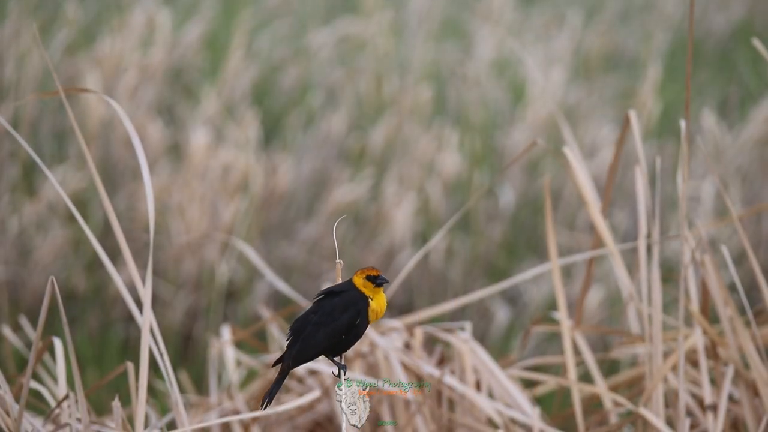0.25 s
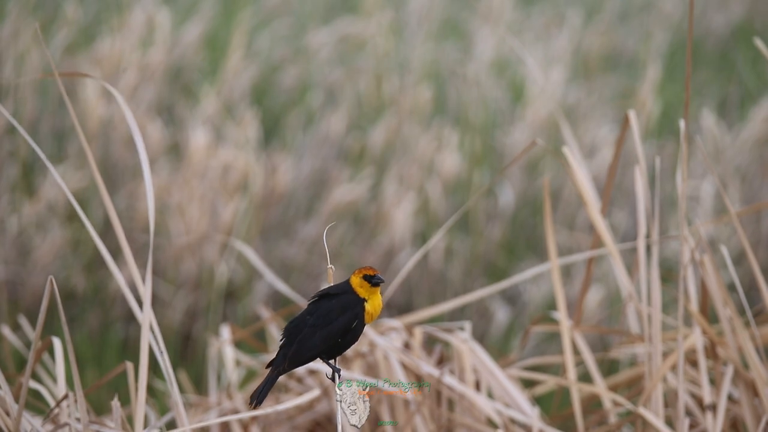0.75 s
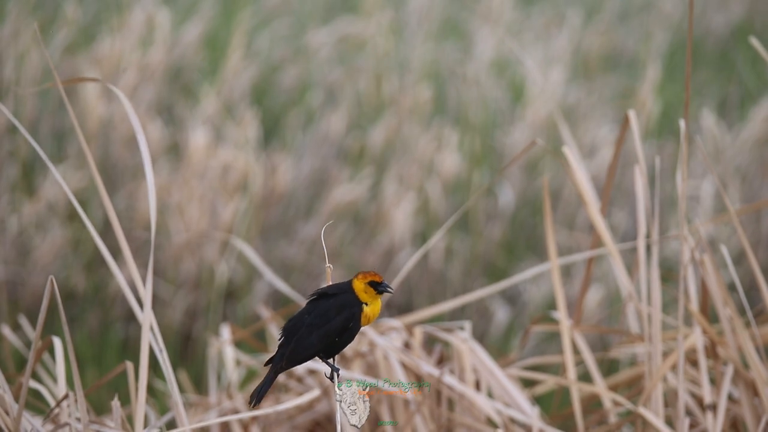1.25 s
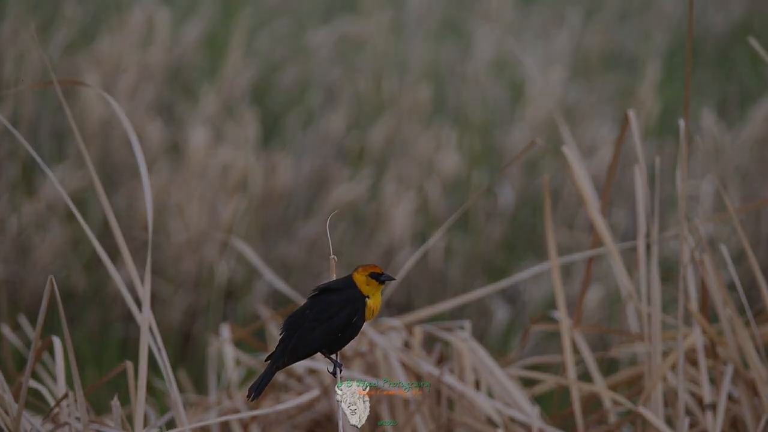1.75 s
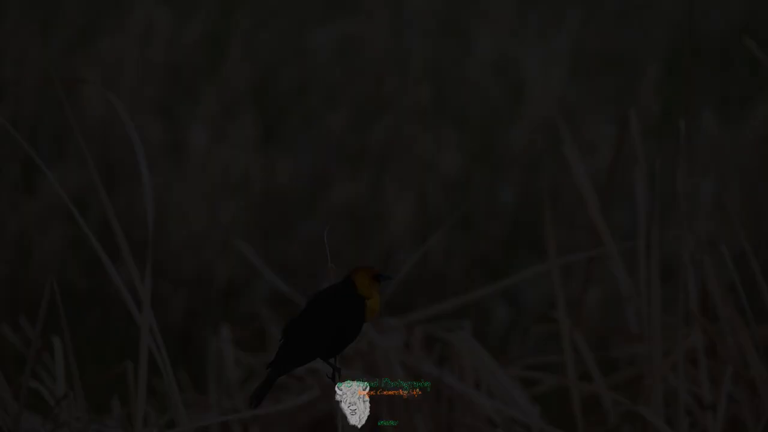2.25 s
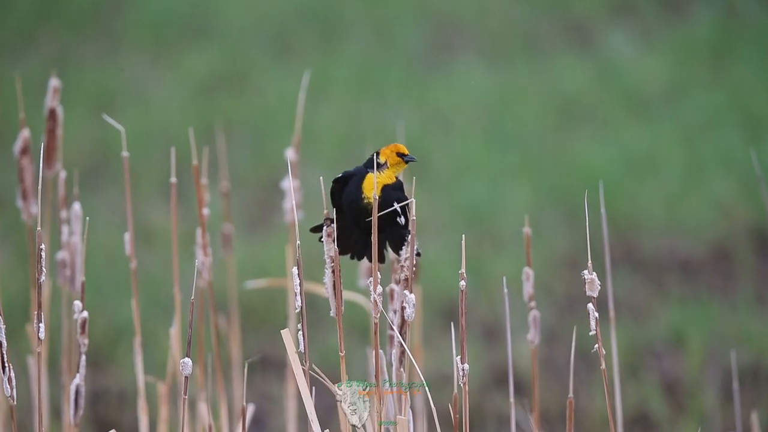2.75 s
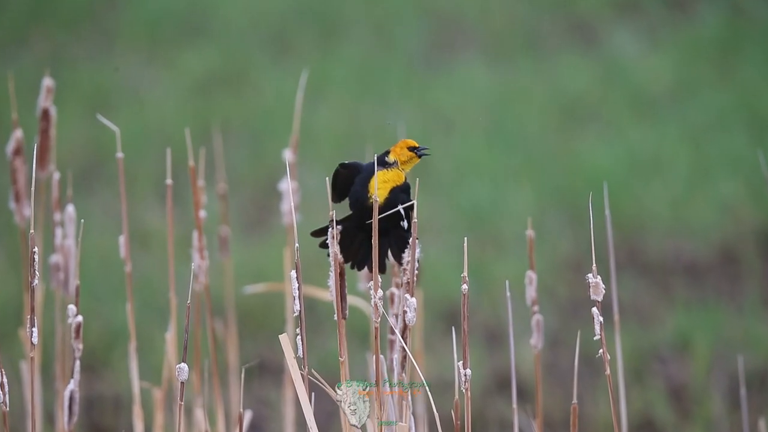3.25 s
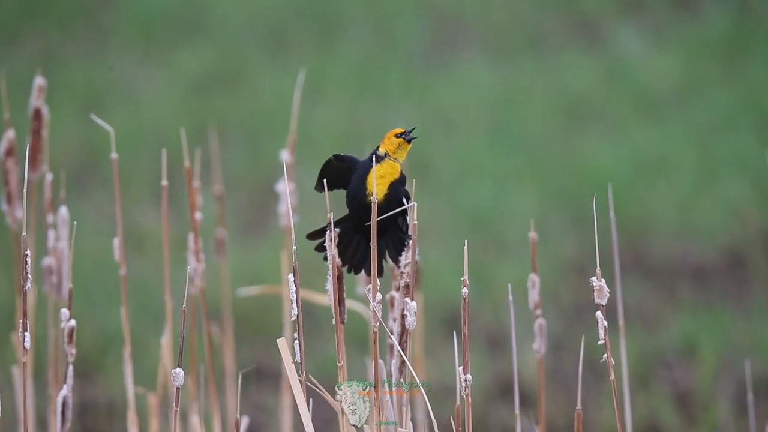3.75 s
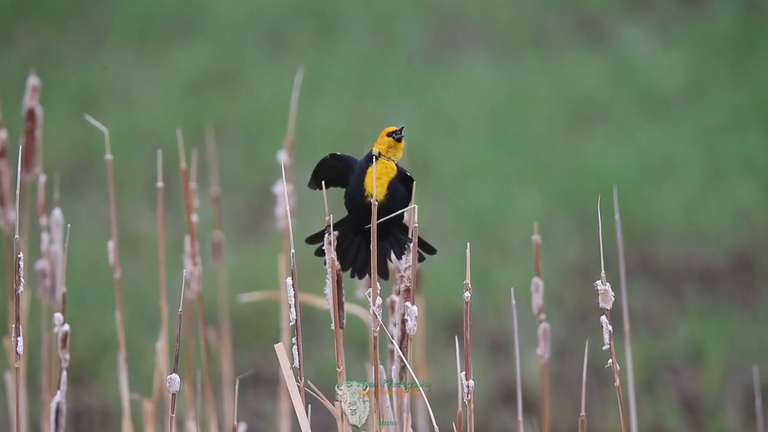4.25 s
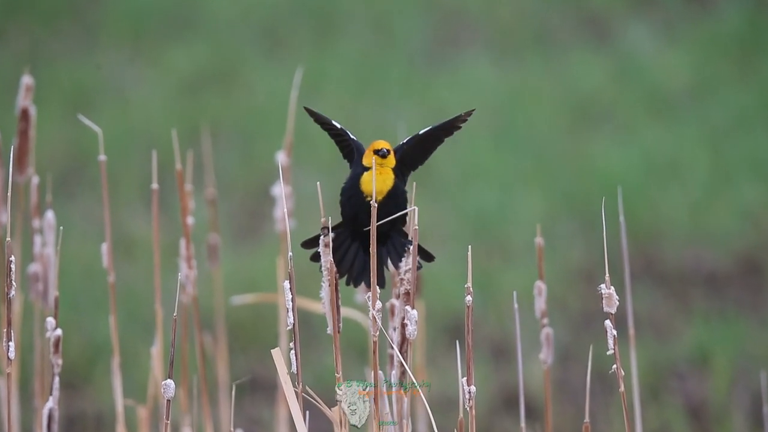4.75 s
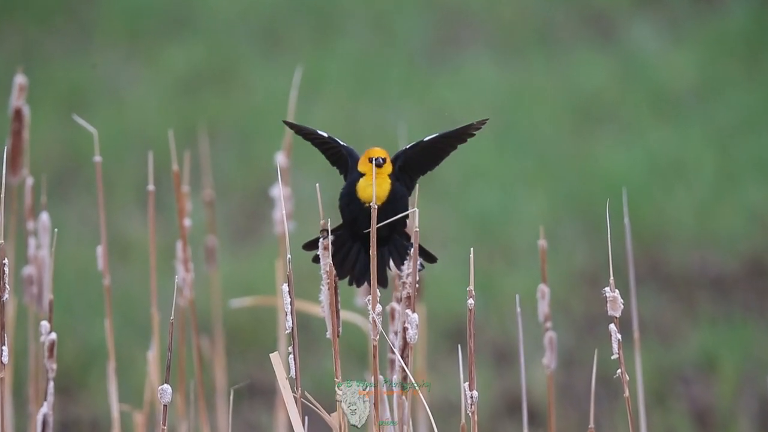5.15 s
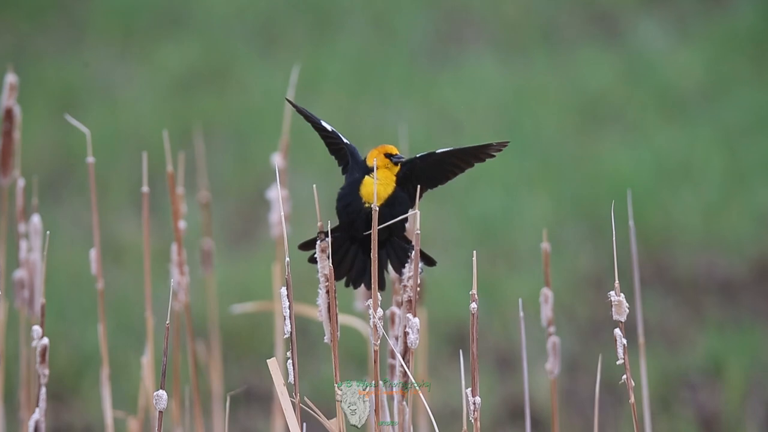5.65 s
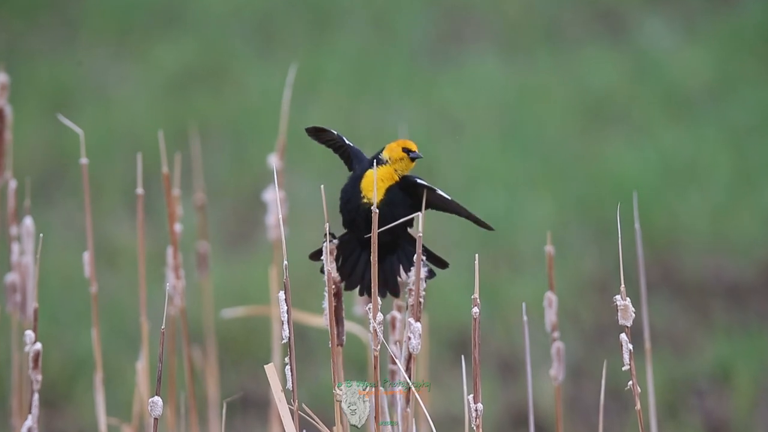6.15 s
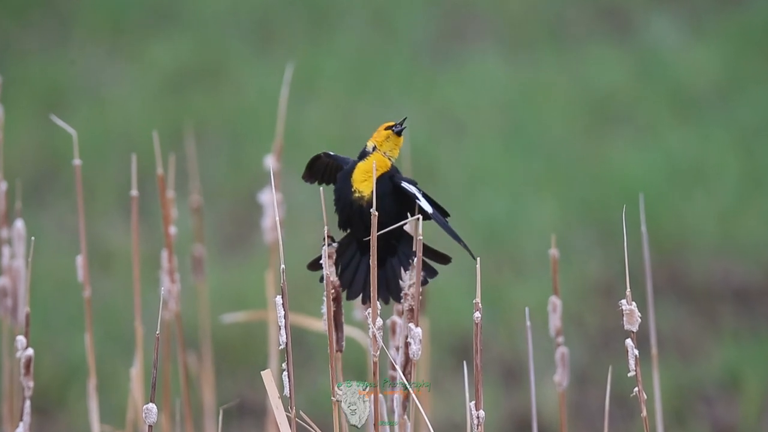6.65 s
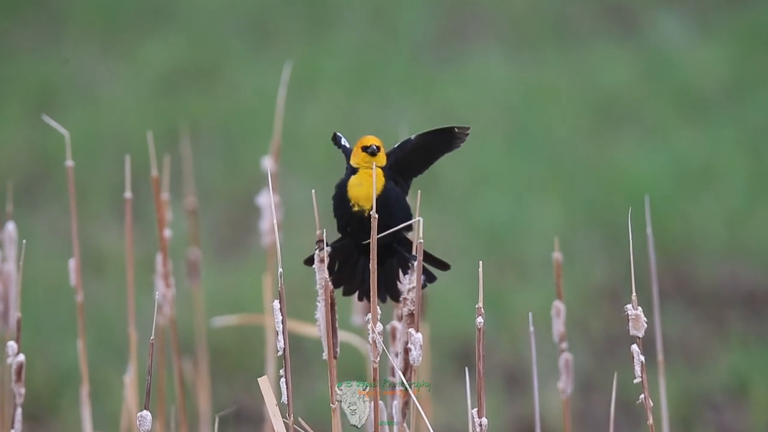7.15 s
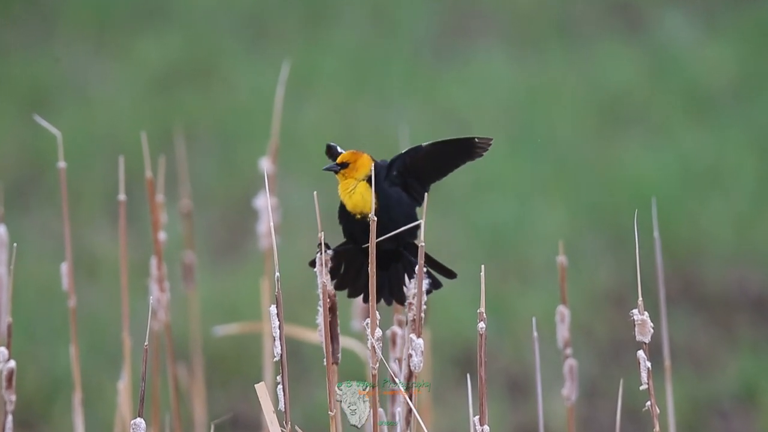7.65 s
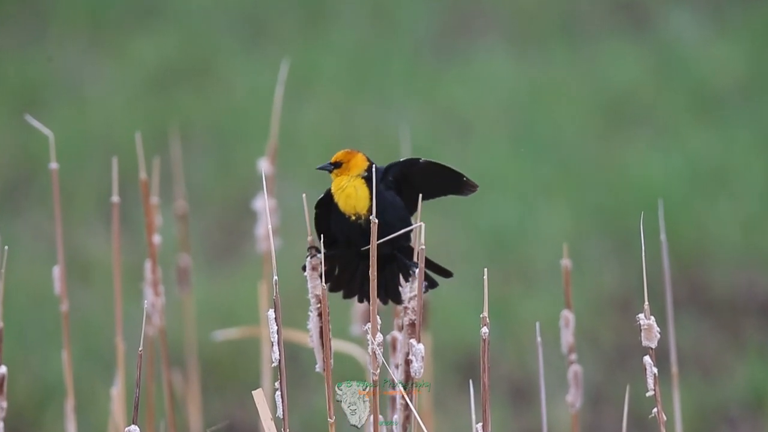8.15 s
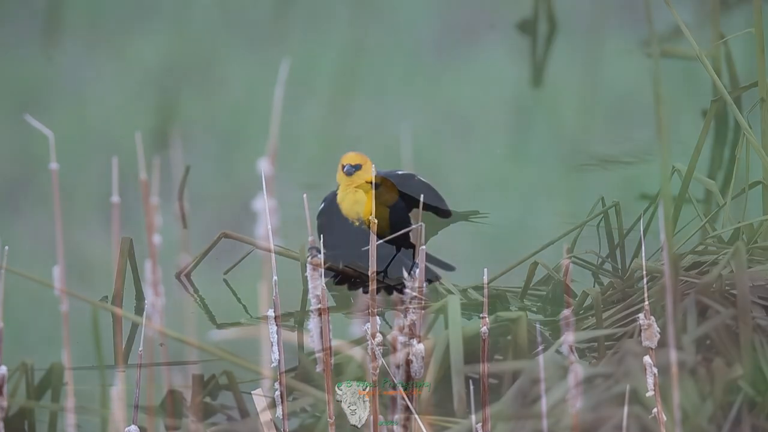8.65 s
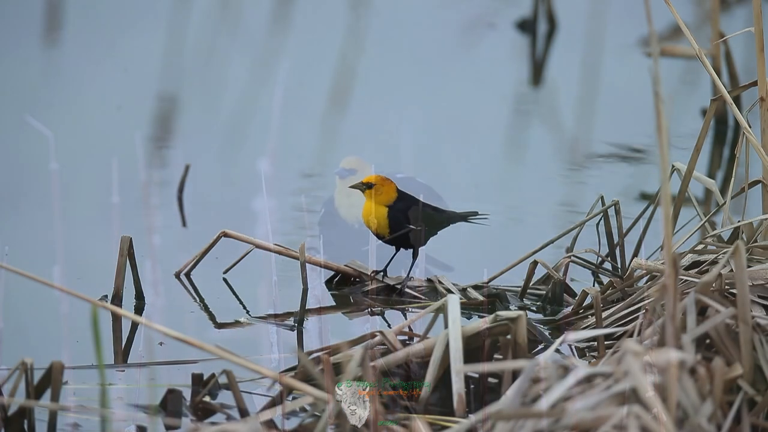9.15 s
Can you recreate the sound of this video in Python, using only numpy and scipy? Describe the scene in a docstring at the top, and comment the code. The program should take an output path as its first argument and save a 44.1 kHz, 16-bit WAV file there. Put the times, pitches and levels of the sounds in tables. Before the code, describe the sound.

After a quiet reedy hush, a marsh blackbird gives loud harsh buzzing screeches and rough clucks over a dense chorus of whistling, chirping birds.

```python
"""A quiet reed bed with a few soft rustles fades out; a hard cut opens on a crowded marsh.
Blackbirds screech (stacks of partials chopped by a fast flutter and blurred by rasp) and cluck (puffs of
noise through throat resonances). Others whistle and chirp in gliding near-sine notes, a far chorus of
random slurred whistles fills the gaps, and gusts of low noise thump the single microphone."""
import sys
import numpy as np
from scipy import signal
from scipy.fft import rfft, irfft
from scipy.io import wavfile
from scipy.ndimage import uniform_filter1d

SR = 44100
rng = np.random.default_rng(int(sys.argv[2]) if len(sys.argv) > 2 else 0)


def log_audio(samples):
    """Write samples as a 16-bit WAV file to the path given in sys.argv[1]."""
    # one column per channel
    frames = np.atleast_2d(samples).T
    # limit to full scale, then quantise
    limited = np.clip(frames, -1, 1)
    pcm = np.round(limited * 32767).astype(np.int16)
    wavfile.write(sys.argv[1], SR, pcm)


N = 415422
T = np.arange(N) / SR
CUT_S = 2.393  # the reed bed gives way to the marsh


def undb(db):
    """Gain of a level in dB."""
    return 10 ** (np.asarray(db) / 20)


def unit(x):
    """Scale to rms 1."""
    return x / np.sqrt(np.mean(x ** 2))


def curve(rows):
    """Join (time_s, value) rows by straight lines."""
    return np.interp(T, *np.transpose(rows))


def coloured(shape):
    """Noise of rms 1 whose spectrum follows (freq_hz, density_db) rows, joined on a log frequency axis."""
    shape_hz, shape_db = np.transpose(shape)
    bin_hz = np.arange(N // 2 + 1) * SR / N + 1  # 1 Hz up keeps the log finite
    bin_db = np.interp(np.log(bin_hz), np.log(shape_hz), shape_db)
    return unit(irfft(rfft(rng.standard_normal(N)) * undb(bin_db), N))


def band(x, hz, width_hz):
    """A single resonance."""
    return signal.lfilter(*signal.iirpeak(hz, hz / width_hz, SR), x)


def walk(rate_hz, size=N):
    """Smooth random wander with about rate_hz turns a second, rms 1."""
    k = max(int(SR / rate_hz), 1)
    return unit(uniform_filter1d(uniform_filter1d(rng.standard_normal(size), k), k))


def burst(start_s, scale_s):
    """Envelope with a quick swell and a longer fall."""
    u = np.clip((T - start_s) / scale_s, 0, None)
    return np.sqrt(u) * np.exp(1 - u ** 2 - u)


def arc(first_hz, middle_hz, last_hz):
    """Four evenly spaced pitches on the parabola through start, middle and end."""
    parabola = np.polyfit([0, .5, 1], [first_hz, middle_hz, last_hz], 2)
    return np.polyval(parabola, np.arange(4) / 3)


def notes(rows, spill_s, edge_s, third_db):
    """Near-sine notes gliding on a cubic through four pitches, with soft ends and a slight quaver."""
    out = np.zeros(N + SR)
    quaver_db = 0.77 * walk(103, size=N + SR)
    for start, length, *hz, early_db, late_db, octave_db in rows:
        # each note spills a little past both of its nominal ends
        i, n = int((start - spill_s) * SR), int((length + 2 * spill_s) * SR)
        s = np.arange(n) / SR
        u = (s - spill_s) / length
        glide = np.polyfit(np.arange(4) / 3, hz, 3)
        phase = 2 * np.pi * np.cumsum(np.polyval(glide, np.clip(u, -.15, 1.15))) / SR
        ends = np.sin(np.pi / 2 * np.clip(np.minimum(s, s[::-1]) / edge_s, 0, 1)) ** 2
        swell_db = np.interp(u, [.25, .75], [early_db, late_db])
        gain = np.sqrt(2) * ends * undb(swell_db + quaver_db[i:i + n])
        second = undb(octave_db) * np.sin(2 * phase)
        third = undb(octave_db + third_db) * np.sin(3 * phase)
        out[i:i + n] += gain * (np.sin(phase) + second + third)
    return out[:N]


def reed_bed():
    """Quiet hush of coloured noise that fades out, with soft rustles as short swells of drier noise."""
    # spectrum of the hush: freq_hz, density_db (per Hz)
    hush_spectrum = [(15, -57), (25, -24), (378, -6), (509, -10), (722, -7), (997, -12.5), (1200, -11),
                     (1300, -9.5), (2170, -17), (3630, -20), (15500, -26)]
    # fade of the hush: time_s, level_db
    hush_level = [(0, -55.5), (1.5, -57), (1.8, -60.5), (2.1, -67), (2.25, -72), (2.36, -87), (2.39, -102)]
    # rustling reeds: start_s, level_db, scale_s (of the swell and fall)
    rustle_rows = [(0.147, -57, 0.017), (0.318, -52.5, 0.051), (0.59, -56, 0.046), (0.686, -55.5, 0.028),
                   (0.808, -52, 0.089), (1.41, -55, 0.017), (1.66, -54, 0.013)]
    hush = coloured(hush_spectrum) * undb(curve(hush_level) + 0.27 * walk(24))
    dry_reeds = coloured([(120, -22), (300, 10.5), (1300, 1), (3000, -2.5), (6000, -26)])
    return hush + dry_reeds * sum(undb(db) * burst(s, scale) for s, db, scale in rustle_rows)


def marsh_hush():
    """Broad coloured noise under the whole marsh, its level drifting slowly."""
    # spectrum of the hush: freq_hz, density_db (per Hz)
    hush_spectrum = [(60, -30), (150, -14), (250, -5), (330, -10), (750, -9), (1050, -3), (1800, -6),
                     (3300, -14), (4300, -22), (15500, -29.5)]
    # its drift: time_s, level_db
    hush_level = [(2.39, -46), (8.4, -47.5), (9.0, -52), (9.42, -48.5)]
    return coloured(hush_spectrum) * undb(curve(hush_level))


def wind():
    """Turbulence thumps the microphone: fluttering low noise under gusts that rise and fall evenly in dB."""
    # gusts: peak_s, level_db, rise_s, fall_s (the last two are the times of a 20 dB change)
    gust_rows = [(2.55, -57, .5, .6), (2.947, -36.5, .025, 0.026), (3.93, -34, 0.19, 0.21),
                 (4.542, -31.5, 0.068, 0.085), (5.95, -56.5, 0.24, 0.11), (6.4, -47.5, .07, 0.067),
                 (6.78, -38.5, 0.12, 0.04), (7.4, -33.5, 0.11, 0.044), (7.72, -43.5, 0.94, 0.069),
                 (8.42, -48, 0.05, 0.077), (8.8, -66, .8, 0.49)]
    calm_db = -72.5
    rumble = coloured([(15, -11), (40, -6.0), (75, -2.5), (120, -9.5), (200, -25), (400, -57)])
    gusts = sum(undb(db - 20 * np.maximum((s - T) / rise, (T - s) / fall))
                for s, db, rise, fall in gust_rows)
    return unit(rumble * undb(2.75 * walk(54))) * (gusts + undb(calm_db))


def chorus(count=520):
    """Many far birds: short slurred whistles at random, most of them low; distance takes their overtones."""
    # level of the whole chorus: time_s, level_db
    chorus_level = [(2.39, -48), (3.0, -46), (3.6, -41), (4.4, -42.5), (5.0, -48.5), (5.6, -45),
                    (6.3, -44.5), (7.0, -44), (7.7, -49), (8.4, -47.5), (9.0, -56.5), (9.42, -49)]
    when, long, pitch, bow, slope, loud = rng.random((count, 6)).T
    hz = 990 * 2 ** (1.8 * pitch ** 1.2)
    shape = np.linspace(-1, 1, 4)
    slant = 0.1608 * (slope[:, None] - .5) * shape
    arch = 0.084 * bow[:, None] * (1 - shape ** 2)
    glide = hz[:, None] * (1 + slant + arch)
    db = -3.0 * np.log(loud + .05) - 7.0 * pitch  # a few stand out, high ones are weaker
    octave_db = -12 - 14.0 * pitch
    rows = np.column_stack([2.2 + when * 7.2, 0.02584 + 0.1024 * long, glide, db, db, octave_db])
    return unit(notes(rows, .01, 0.0031, -8)) * undb(curve(chorus_level))


def echoes(x):
    """Reeds and water scatter a short, duller tail of decaying noise."""
    t60_s, echo_db = 0.43, -16
    s = np.arange(SR // 2) / SR
    decay = np.exp(-np.log(1000) * s / t60_s) * (s > .006)
    tail = band(rng.standard_normal(len(s)), 1100, 7800) * decay
    return x + undb(echo_db) * signal.fftconvolve(x, tail / np.sqrt(np.sum(tail ** 2)))[:N]


def chirps():
    """Quick pitch arches, tilted up or down; falling ones swell."""
    # arched chirps: start_s, length_s, top_hz, slant (end over start pitch), level_db,
    # octave_db (second harmonic against the first)
    chirp_rows = [(2.399, 0.012, 1505, .89, -40.5, -14), (3.63, 0.017, 2424, 1.22, -28.5, -23),
                  (4.313, 0.025, 2310, 0.98, -38, -24), (4.378, 0.02, 3650, 1.17, -39, -8),
                  (5.435, 0.017, 3410, 1.26, -53, -3), (5.736, 0.016, 3530, 0.69, -52, -19),
                  (6.12, .029, 3520, 0.99, -45, -11), (6.302, 0.021, 3500, 0.9, -47, -10.5),
                  (6.336, 0.014, 4280, 0.87, -50, -25), (6.406, .02, 4300, 0.88, -50, -25),
                  (7.113, 0.019, 3980, 0.85, -51.5, -6), (7.194, 0.0075, 3630, 0.89, -43, -15),
                  (7.268, 0.01, 3400, 1, -41.5, -16), (7.33, 0.029, 3770, 1.1, -40.5, -13),
                  (7.418, .007, 3470, 0.92, -37, -21), (7.443, 0.0079, 3670, 0.66, -39, -23),
                  (7.479, 0.016, 3280, 1.15, -47, -9), (7.526, 0.0088, 3650, 0.54, -41.5, -22),
                  (7.569, 0.013, 3770, 1.07, -43.5, -7.5), (7.608, 0.022, 2750, 0.77, -41.5, -25),
                  (7.64, .015, 3860, 1, -40, -9.5), (7.715, 0.015, 3810, 0.94, -38, -11),
                  (7.791, 0.023, 3720, 1.09, -40, -8), (7.855, 0.029, 3570, 1.15, -37.5, -17),
                  (7.913, 0.039, 3360, 1.4, -46, -9), (7.95, 0.011, 3650, 1.07, -37, -14),
                  (8.032, .011, 3440, 0.94, -42, -11.5), (8.083, 0.015, 3420, 0.74, -44.5, -20),
                  (8.102, 0.017, 3340, 0.9, -39, -16), (8.171, 0.014, 3430, 0.95, -37, -14),
                  (8.242, 0.013, 3450, 0.91, -35.5, -39), (8.313, 0.011, 3450, 1.04, -34.5, -24),
                  (8.387, 0.0085, 3530, 1, -36, -23), (8.435, .015, 4180, 1.1, -46, -30),
                  (8.455, 0.015, 3380, 0.96, -40.5, -29), (8.532, .015, 3390, 0.88, -41, -26),
                  (8.62, 0.019, 3770, 1.44, -45, -13), (8.726, 0.029, 3320, 1.2, -43.5, -16),
                  (8.76, 0.016, 3500, 0.94, -45, -25), (8.813, 0.012, 3690, 1.17, -32.5, -15),
                  (8.86, 0.018, 3795, 1.12, -31.5, -12), (8.979, 0.012, 3660, 1.17, -34.5, -18)]
    arch_share = .08  # share of the top pitch lost at both ends, before the slant
    swell_db_per_octave = 19  # for each octave that a chirp falls
    rows = []
    for s, length, hz, slant, db, octave_db in chirp_rows:
        foot_hz = hz * (1 - arch_share)
        swell_db = -swell_db_per_octave * np.log2(min(slant, 1))
        rows.append((s, length, *arc(foot_hz / np.sqrt(slant), hz, foot_hz * np.sqrt(slant)),
                     db - swell_db / 2, db + swell_db / 2, octave_db))
    return notes(rows, 0.0059, 0.0089, -24)


def whistle_octave_db(first_hz, middle_hz, last_hz):
    """Second harmonic: pressed on a rise, lifted by the beak resonance, faded on shrill notes."""
    held_db, rise_db_per_octave = -23.5, 26.5
    beak_hz, beak_octaves, beak_db = 3500, .22, 14
    shrill_hz, shrill_db_per_octave = 2300, -25
    pressed = held_db + rise_db_per_octave * np.log2(last_hz / first_hz)
    beak = beak_db * np.exp(-(np.log2(2 * middle_hz / beak_hz) / beak_octaves) ** 2)
    shrill = shrill_db_per_octave * max(np.log2(middle_hz / shrill_hz), 0)
    return min(pressed + (beak + shrill), -2)


def whistles():
    """Slurred notes; rising ones are pressed and rich in overtones, falling ones purer."""
    # whistled notes: start_s, length_s, start_hz, middle_hz, end_hz, level_db, swell_db (early to late)
    whistle_rows = [(2.415, 0.046, 1157, 1286, 1470, -47, 9), (2.438, 0.04, 3090, 3260, 3500, -47, -2),
                    (2.461, 0.07, 1860, 1696, 1600, -41.5, 5), (2.466, .12, 1048, 1062, 1040, -40.5, 9.5),
                    (2.473, 0.041, 2370, 2460, 2720, -50.5, 21), (2.518, .125, 1870, 2006, 2080, -44.5, 5),
                    (2.59, 0.15, 1039, 1029, 1021, -38.5, -3), (2.651, 0.11, 1840, 1720, 1624, -36.5, 5),
                    (2.725, .1, 1257, 1330, 1290, -42, -3), (2.972, 0.084, 1754, 1660, 1430, -41.5, 6),
                    (3.052, 0.086, 1794, 1700, 1610, -42.5, 5), (3.081, 0.079, 2970, 3270, 3480, -50.5, -4),
                    (3.089, 0.053, 2230, 2430, 2550, -49, -3), (3.137, 0.09, 1033, 1287, 1310, -44.5, 11),
                    (3.16, 0.044, 2200, 2510, 2700, -43, 1), (3.165, 0.053, 1920, 1860, 1720, -44, 1),
                    (3.185, 0.057, 4640, 4580, 4660, -51.5, -3), (3.217, 0.13, 1770, 1805, 1645, -42.5, 9),
                    (3.656, 0.062, 2486, 2460, 2310, -34.5, -8), (3.831, 0.069, 1280, 1340, 1350, -44, 3),
                    (3.894, 0.089, 915, 1003, 1090, -43.5, 0), (4.123, .059, 1262, 1404, 1480, -40, -7),
                    (4.35, 0.23, 1013, 1034, 1128, -42, 3), (4.398, .12, 1934, 1949, 1936, -32, 9.5),
                    (4.543, .1, 1336, 1390, 1360, -47, -15), (4.655, 0.049, 3560, 3810, 3780, -56, 7),
                    (4.937, .19, 951, 991, 1132, -46.5, 2), (5.28, 0.14, 1107, 1006, 904, -38.5, 11),
                    (5.332, .11, 2530, 2610, 2800, -60, 3), (5.503, .12, 1436, 1432, 1410, -53, -16),
                    (5.615, .056, 2650, 2810, 2770, -49.5, -1), (5.781, 0.1, 1430, 1760, 1990, -50, 4),
                    (5.787, .04, 3180, 3560, 3570, -50, -7), (5.787, 0.062, 1454, 1410, 1320, -45.5, 11),
                    (5.875, .12, 1950, 2050, 1780, -39, 2), (6.034, 0.028, 3555, 3510, 3560, -45.5, -10),
                    (6.055, .03, 1135, 1180, 1130, -40.5, -15), (6.118, 0.065, 1734, 1920, 1790, -50, 10),
                    (6.214, 0.034, 3480, 3510, 3650, -43, -9), (6.218, 0.16, 1440, 1407, 1520, -46.5, -2),
                    (6.242, 0.048, 1132, 1175, 1200, -41, -18), (6.866, .086, 1416, 1357, 1360, -35.5, 8),
                    (7.028, .14, 1124, 943, 924, -40, -4), (7.112, 0.041, 1082, 1200, 1260, -45.5, 3),
                    (7.13, 0.16, 2220, 2580, 2280, -53.5, -4), (7.18, 0.15, 1286, 1212, 1080, -51.5, -10),
                    (7.2, .14, 1676, 1930, 1790, -50.5, -8), (7.331, 0.06, 1687, 1587, 1480, -43.5, -4),
                    (7.475, 0.12, 1435, 1455, 1410, -49.5, -9), (7.558, 0.23, 943, 936, 935, -37.5, 5),
                    (7.765, 0.066, 1372, 1900, 2560, -43.5, 2), (7.81, 0.042, 2404, 2550, 2480, -28, -4),
                    (7.83, 0.13, 1860, 1860, 1550, -45.5, -3), (7.914, 0.054, 2030, 2185, 2140, -45, -3),
                    (7.974, 0.077, 1092, 1170, 1410, -43, 1), (8.022, 0.064, 1833, 1745, 1630, -42, 1),
                    (8.102, 0.078, 1710, 1750, 1610, -45.5, 1), (8.22, .08, 4120, 4120, 4100, -54, 5),
                    (8.249, .096, 1880, 2150, 2210, -53, -6), (8.36, 0.091, 4600, 4620, 4500, -60, 4),
                    (8.273, 0.15, 2730, 3000, 3050, -46.5, 5), (8.526, 0.035, 764, 1002, 1110, -39.5, 3),
                    (8.56, .06, 2950, 3280, 3500, -48, -4), (8.56, 0.044, 1137, 1220, 1234, -42, -2),
                    (9.031, .12, 1903, 1965, 1955, -44, 0), (9.031, 0.096, 3850, 3920, 3930, -42.5, -7),
                    (9.253, 0.048, 1018, 1117, 1250, -48, 9), (9.303, 0.11, 1950, 2075, 2080, -46, -2),
                    (9.305, 0.042, 1397, 1457, 1490, -47, -5)]
    rows = [(s, length, *arc(a, b, c), db - swell_db / 2, db + swell_db / 2, whistle_octave_db(a, b, c))
            for s, length, a, b, c, db, swell_db in whistle_rows]
    return notes(rows, .008, 0.013, -12)


def clucks():
    """Rough puffs of air through the throat resonances; the upper ones vary from cluck to cluck."""
    # harsh clucks: start_s, level_db, treble_db (upper resonances), scale_s (of the swell and fall)
    cluck_rows = [(4.184, -27, -10, 0.042), (4.244, -29, -2.5, 0.031), (6.637, -47, 10.5, 0.054),
                  (4.359, -28, -7, 0.024), (4.409, -29, -6, 0.048), (5.469, -24, -14, 0.03),
                  (5.849, -21, -15.5, 0.039), (6, -25.5, -9.5, 0.04), (6.191, -25.5, -4, 0.042),
                  (8.785, -36, -5, 0.071), (8.843, -36.5, 3.5, 0.022), (8.963, -36.5, -1, 0.02),
                  (9, -38.5, -1.5, 0.049)]
    # throat resonances: freq_hz, width_hz, level_db
    throat_rows = [(1700, 630, -7.5), (3160, 340, -11), (4510, 280, -11), (5920, 920, -12.5),
                   (6630, 810, -11)]
    grit = rng.standard_normal(N) * undb(3.5 * walk(400))
    rings = [undb(db) * unit(band(band(grit, hz, w), hz, w)) for hz, w, db in throat_rows]
    upper = sum(rings[1:])
    return sum(undb(db) * burst(s, scale) * (rings[0] + undb(treble_db) * upper)
               for s, db, treble_db, scale in cluck_rows)


def phrase(syllables):
    """Rows (time_s, pitch_hz, level_db, treble_db): every syllable opens, bows up, and sags."""
    attack_s, release_s = .05, 0.0602
    # added in mid-syllable for each second of its length: share of pitch, level and treble in dB
    bow, bow_db, bow_treble_db = .04, 6, -1
    # pitch sags and level dips a little between syllables and far at both ends of a screech
    break_sag, break_db = 0.02, -1.5
    end_sag, start_db, end_db = 0.0455, -12, -25.5
    rows = []
    for k, syllable in enumerate(syllables):
        start, end, early_hz, late_hz, early_db, late_db, open_db, bright_db, dull_db = syllable
        last, long = k == len(syllables) - 1, end - start
        sag_in, in_db = (break_sag, break_db) if k else (end_sag, start_db)
        sag_out, out_db = (end_sag, end_db) if last else (break_sag, break_db)
        rise, fall = np.minimum([attack_s, release_s], long / 3)
        middle_hz = (early_hz + late_hz) / 2 * (1 + bow * long)
        middle_db = (early_db + late_db) / 2 + bow_db * long
        middle_treble_db = (bright_db + dull_db) / 2 + bow_treble_db * long
        close_db = dull_db if last else syllables[k + 1][6]  # treble leads into the next opening
        rows += [(start, early_hz * (1 - sag_in), early_db + in_db, open_db),
                 (start + rise, early_hz, early_db, bright_db),
                 (start + long / 2, middle_hz, middle_db, middle_treble_db),
                 (end - fall, late_hz, late_db, dull_db),
                 (end, late_hz * (1 - sag_out), late_db + out_db, close_db)]
    return sorted(rows)


def screech(rows, tones, tone_db, rasp_hz, offset_db, gain_db, multiple, chop, warble, rasp):
    """All partials ride one flutter rate, which chops them into sidebands; turbulence blurs a share of them."""
    s, pitch, level_db, treble_db = np.transpose(rows)
    i, j = int(s[0] * SR), int(s[-1] * SR)
    t = T[i:j]
    jitter = 1 + .0008 * walk(60, size=j - i)
    rate = uniform_filter1d(np.interp(t, s, pitch), SR // 40) / multiple * jitter
    flutter = 2 * np.pi * np.cumsum(rate) / SR
    voice = 0
    for k, db in zip(tones, tone_db):
        lag = 2 * np.pi * rng.random(2)
        # chopped once and warbled four times in each flutter
        chopped = np.exp(chop * np.cos(flutter + lag[0]))
        clean = unit(chopped * np.sin(k * flutter + warble * np.sin(4 * flutter + lag[1])))
        in_phase = walk(rasp_hz, size=j - i) * np.sin(k * flutter)
        blur = unit(in_phase + walk(rasp_hz, size=j - i) * np.cos(k * flutter))
        # a wider skirt fills the valleys
        blur = unit(blur + .5 * walk(4 * rasp_hz, size=j - i) * np.sin(k * flutter))
        # each partial swells on its own as the throat shifts
        drift_db = 2.2 * walk(8, size=j - i)
        # treble sets in from 4 kHz and is full at 5 kHz
        tilt_db = (np.interp(t, s, treble_db) + offset_db) * np.clip(k * rate / 1000 - 4, 0, 1)
        # higher partials come out rougher
        rough = np.clip(rasp * (k * rate / 3000) ** .4, 0, .9)
        partial = np.sqrt(1 - rough) * clean * undb(drift_db) + np.sqrt(rough) * blur
        voice = voice + undb(db + tilt_db) * partial
    ends = np.clip(np.minimum(t - t[0], t[-1] - t) / 0.016, 0, 1)
    out = np.zeros(N)
    out[i:j] = unit(voice) * ends * undb(np.interp(t, s, level_db) + gain_db)
    return out


def screeches():
    """Six screeches, each with its own phrase of syllables, stack of partials and grain of flutter."""
    # syllables of each screech: start_s, end_s, early_hz, late_hz (of one strong partial), early_db, late_db
    # (before the throat's gain), treble dB at the opening, early and late (before the throat's offset)
    syllable_rows = [
        [(2.98, 3.2, 5970, 6150, -56, -51, 2, -7, -4), (3.23, 3.475, 6030, 6100, -53, -46, -9, -2, -6.5)],
        [(3.475, 3.58, 5790, 5770, -41, -39, 16, 1, .6), (3.58, 3.75, 5670, 5900, -35, -33.5, .5, 1, 0.54),
         (3.75, 3.98, 5717, 5700, -36.5, -33.5, 1.5, 1, 0.65),
         (3.98, 4.29, 5717, 5740, -34, -34, 2.5, 0.17, .6), (4.29, 4.42, 5700, 6000, -37, -44, 3.5, 0.49, .6)],
        [(4.41, 4.58, 3830, 3900, -51, -47.5, .5, .5, .6)],
        [(4.745, 5.0, 2340, 2330, -42.5, -36.5, -15, -7, -12),
         (5.0, 5.36, 2326, 2300, -37.5, -38.5, -25, -10, -10.5)],
        [(6.4, 6.67, 2325, 2350, -37, -33, -3, -5.5, -6), (6.67, 7.09, 2325, 2340, -32, -32.5, -10, -6.5, -9.5)],
        [(8.08, 8.27, 5960, 6300, -63, -59.5, .5, 1, .6), (8.28, 8.5, 5960, 6400, -59, -56.5, -5, 0.17, 0.47),
         (8.51, 9.29, 5877, 5900, -52.5, -58, -8, 0.17, .6)],
    ]
    # strong partials as multiples of the flutter rate
    rise_tones, long_tones, clear_tones = [35, 48, 53, 60, 72, 80, 94], [27, 32, 41, 45, 49, 52, 58, 64, 70, 78, 89,
                                                               98, 103, 110, 125], [10, 13, 15, 16, 18, 19,
                                                                                   20, 21, 23, 24, 26, 27,
                                                                                   28, 32]
    pair_tones, loud_tones, far_tones = [18, 22, 27, 36, 40, 45, 50, 54, 65, 72, 77, 81, 92, 102], [23, 27, 36, 39, 43, 47, 50, 63, 66, 74, 84, 88,
                                                             92, 100, 115], [28, 43, 49, 52, 59, 76, 83,
                                                                                 100, 104]
    # relative levels of those partials [dB]
    rise_db, long_db, clear_db = [-3.5, -8, -5, -3, -6, -19, -21], [-4, -7.5, -8, -1.7, -3, -5, -14, -13.5, -9.5, -3.5, -16,
                                                   -13, -13.5, -17.5, -26], [1, -7, 0, -14, -1, -7, -14, -5, -4, -12,
                                                                    -1, -2, -2, -0.5]
    pair_db, loud_db, far_db = [-11, -15, -13, -11.5, -9, -10, -10, -14.5, -11.5, -8, -10, -12, -14.5,
                                -24.5], [-6.5, -11.5, -4.5, -5, -21, -12.5, -7.5, -6.5, -6, -9, -19,
                                                 -11.5, -13.5, -23.5, -29.5], [-13, -1.5, -2.5, -0.5, -3.5, -11.5, -5,
                                                                  -8.5, -11]
    # flutter of each screech: multiple (that the pitch curve follows), chop depth, warble depth,
    # rasp (blurred share 0-1 of the power of a partial at 3 kHz)
    grain_rows = [(60, .5, .3, .55), (78, .9, .6, .48), (16, .05, 0, .15), (27, .7, .5, .33),
                  (27, .8, .6, .33), (83, .8, .5, .55)]
    # partials, their levels, rasp_hz (rate of the blur), treble offset_db, gain_db
    throats = [(rise_tones, rise_db, 300, 0, 3), (long_tones, long_db, 450, 0, .6),
               (clear_tones, clear_db, 250, 0, 3), (pair_tones, pair_db, 450, 5, .6),
               (loud_tones, loud_db, 450, 5, .6), (far_tones, far_db, 500, 0, 6)]
    return sum(screech(phrase(syllables), *throat, *grain)
               for syllables, throat, grain in zip(syllable_rows, throats, grain_rows))


def scene():
    """Reed bed and marsh joined by a hard cut, the same in both channels."""
    near_birds = chirps() + whistles() + clucks() + screeches()
    marsh = marsh_hush() + wind() + echoes(near_birds + chorus())
    mono = np.where(T < CUT_S, reed_bed(), marsh)
    return np.array([mono, mono])


def record(dry):
    """A steep elliptic low-pass removes the extreme top."""
    top_hz = 15750
    return signal.sosfilt(signal.ellip(10, .2, 60, top_hz, fs=SR, output="sos"), dry)


dry = scene()
out = record(dry)
log_audio(out)
```